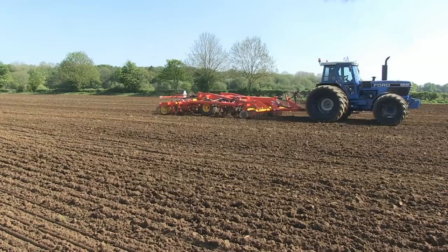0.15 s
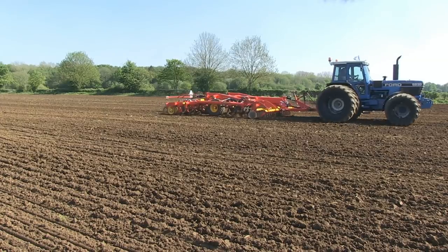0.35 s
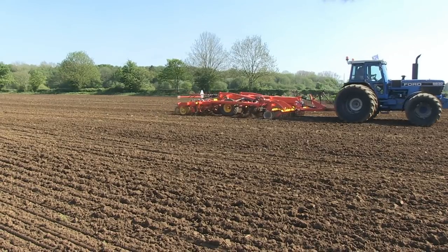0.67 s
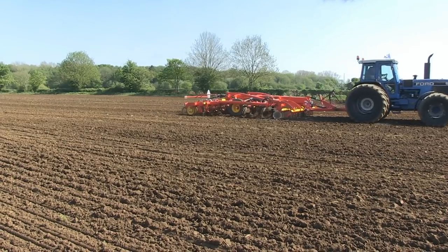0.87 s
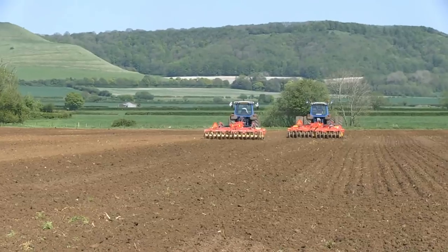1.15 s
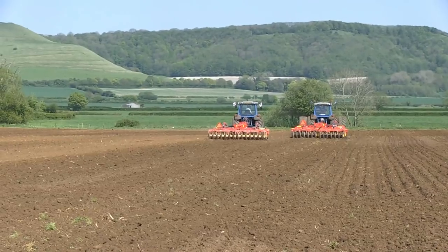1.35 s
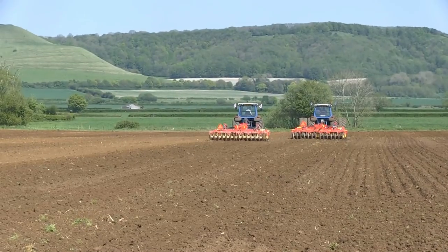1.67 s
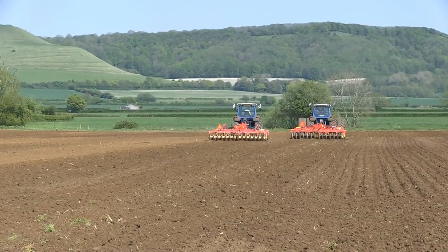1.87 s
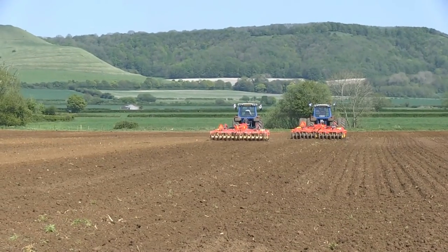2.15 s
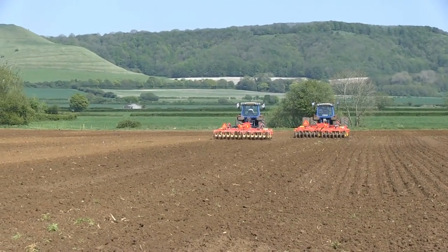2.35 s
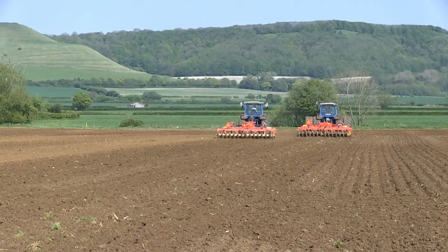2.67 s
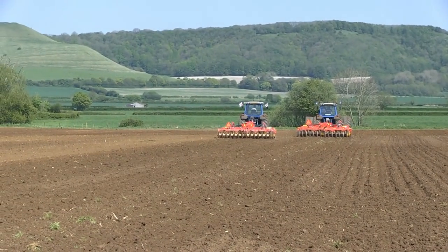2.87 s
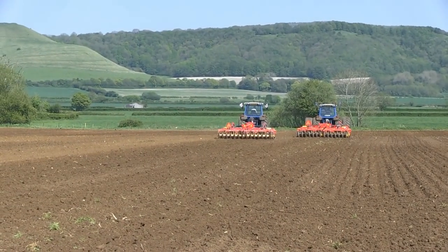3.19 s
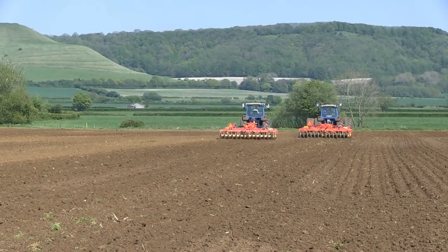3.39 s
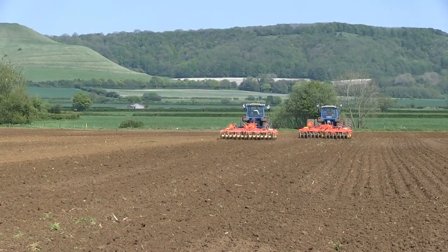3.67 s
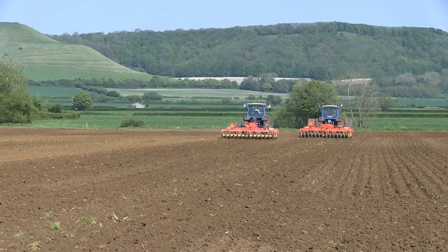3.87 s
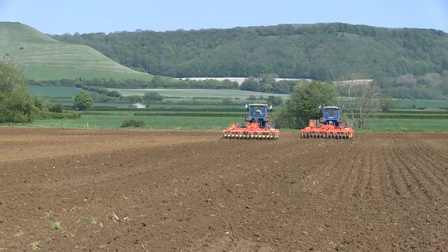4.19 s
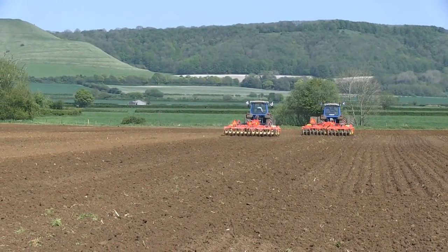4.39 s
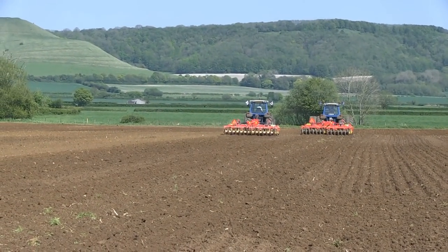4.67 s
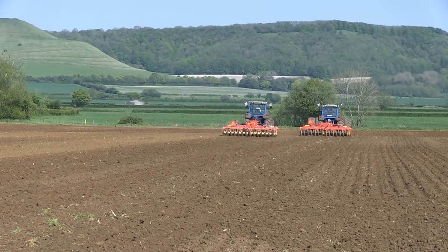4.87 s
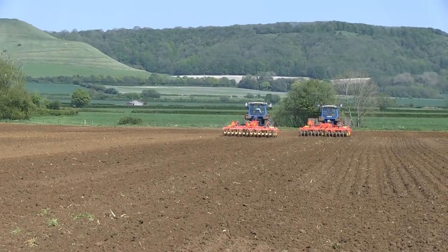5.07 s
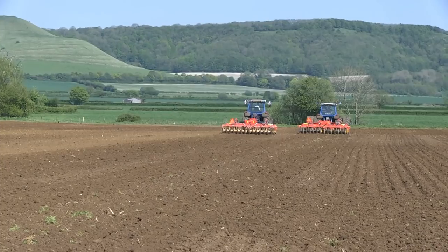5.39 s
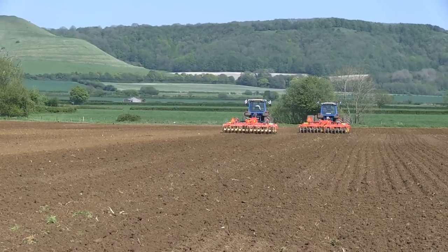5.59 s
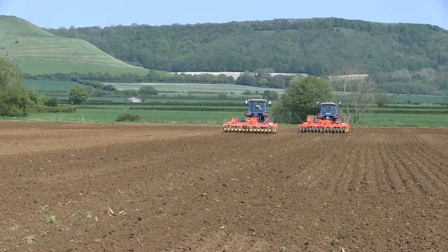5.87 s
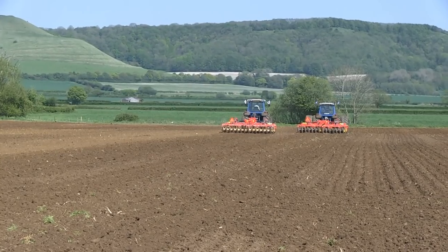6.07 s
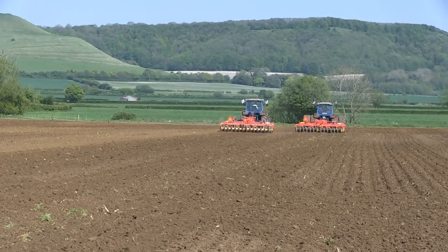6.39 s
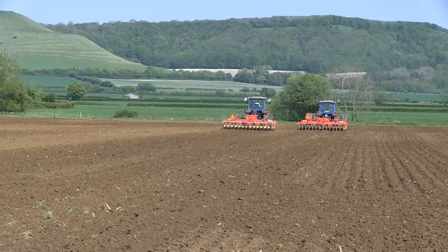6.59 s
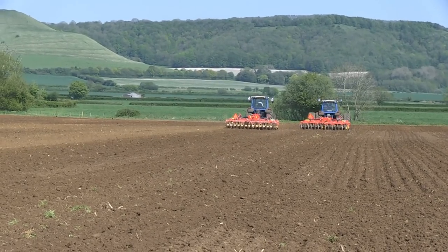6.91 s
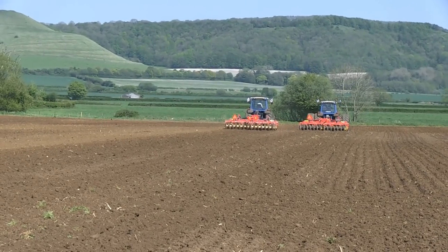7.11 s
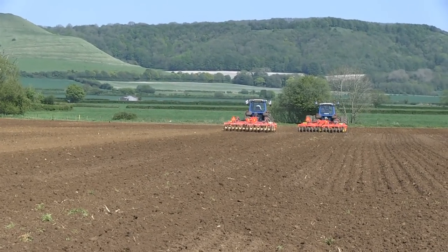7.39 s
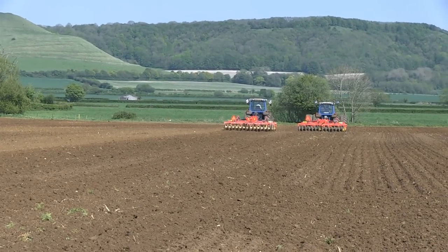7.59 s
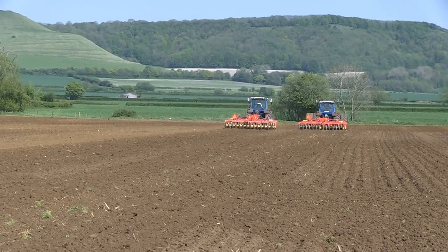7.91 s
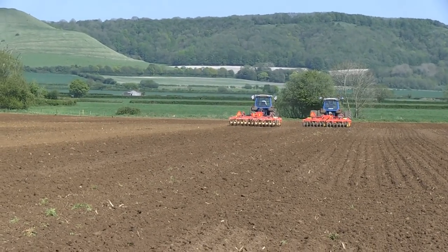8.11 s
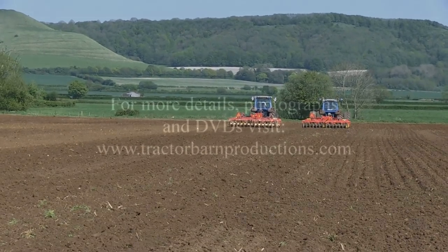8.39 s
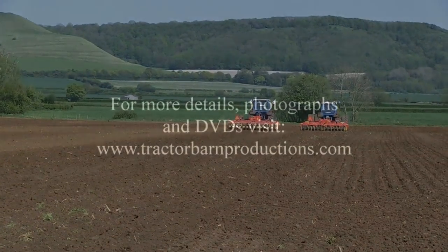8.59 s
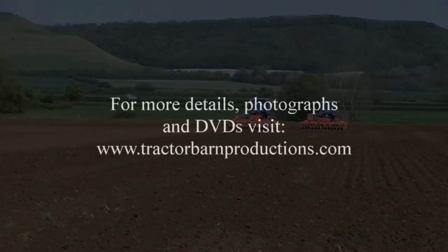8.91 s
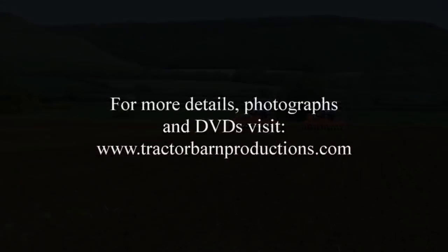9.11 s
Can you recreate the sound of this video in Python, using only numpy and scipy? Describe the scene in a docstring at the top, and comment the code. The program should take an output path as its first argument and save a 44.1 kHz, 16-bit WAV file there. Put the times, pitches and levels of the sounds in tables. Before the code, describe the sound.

For the first second a diesel tractor works close by in an open field: a loud, steady, low drone and pulsing roar, with gear whine and the gritty rush of cultivator tines through soil. At about 1 second it cuts abruptly to two much quieter, distant tractors. Their engine notes beat against each other over diesel clatter, low rumble, faint gear whine and soft soil scraping. A thin, fluttering squeal from a dry roller bearing runs underneath, strongest around 4 seconds. A few very faint dry ticks sound nearby between 2 and 4 seconds. Light wind bumps the microphone just after 1 second and near 7, more softly around 3.3 and 5.5. A faint, bright metallic ring from the machinery swells around 6 and 8 seconds. From about 8 seconds everything fades, reaching silence just after 9.

```python
"""A farm field: a six-cylinder tractor hauls a cultivator close by, and after a second the scene cuts to
two distant tractors. Periodic exhaust pulses give each engine a low drone; the distant firing notes
beat against each other over diesel clatter and gear whine. Tines scrape through soil, the machinery has
a bright metallic ring, and friction makes a dry roller bearing squeal. Light wind buffets the
microphone, a few faint ticks sound nearby, and the sound fades out."""
import sys
import numpy as np
from scipy import signal
from scipy.fft import rfft, irfft, next_fast_len
from scipy.io import wavfile

SR = 44100
rng = np.random.default_rng(int(sys.argv[2]) if len(sys.argv) > 2 else 0)


def int16_out(signal):
    """Quantize to a 16-bit WAV file."""
    q = np.round(np.clip(np.atleast_2d(signal).T, -1, 1) * 32767)
    wavfile.write(sys.argv[1], SR, q.astype(np.int16))


N = 407915
T = np.arange(N) / SR

NEAR_END_S, FAR_START_S = 1.005, 1.025
FADE_FROM_S, FADE_TO_S = 8.12, 9.248

# Engine speeds: time_s, firing_rate_hz
NEAR_FIRING = [(0, 101.9), (1, 101.9)]   # steady
SLOW_FIRING = [(2.9, 82.3), (5.4, 81.93), (7.9, 81.18)]   # the slower distant engine sags under load
FAST_FIRING = [(4.6, 92.95), (6.3, 92.35), (8.6, 94.0)]   # the faster one dips and picks up
# Tones at multiples of the four-stroke cycle rate, order 6 being the firing note: order, level_db
NEAR_TONES = [(4, -55), (5, -36), (6, -19.5), (7, -34), (9, -46.5), (10, -55), (11, -43.5), (12, -45),
              (14, -39), (16, -53.5), (17, -47), (20, -44), (26, -44.5), (27, -40.5), (28, -44),
              (32, -44.5), (47, -41), (54, -41), (57, -38), (75, -61.5), (76, -41)]   # low exhaust drone and faint higher whines
SLOW_TONES = [(3, -59), (4, -61), (6, -31.5), (7, -42), (8, -43), (9, -48), (10, -46.5), (12, -39.5),
              (13, -73), (14, -45.5), (15, -57), (16, -61), (18, -61.5), (20, -68), (22, -62.5),
              (24, -62.5), (30, -61.5), (32, -60), (33, -71), (34, -67.5), (36, -60.5), (38, -59.5),
              (39, -65.5), (40, -61.5), (42, -69.5), (44, -63), (46, -67.5), (50, -62.5), (51, -65.5)]
FAST_TONES = [(6, -37.5), (7, -53), (8, -61), (9, -53.5), (12, -59.5), (16, -81.5)]
# Relative knock of each cylinder, in firing order: strength_db
CYLINDER_KNOCK = [1, -7.5, -2, 2.5, 2, -7]
# Transmission tones: pitch_hz, width_hz, level_db
NEAR_GEAR_TONES = [(677, 1.5, -30), (743, 4, -36), (582, 4, -37), (1017, 5, -40), (1324, 5, -41),
                   (1423, 5, -43), (1743, 5, -44), (2112, 12, -39), (4400, 70, -41)]
FAR_GEAR_TONES = [(628, 6, -58), (1093, 5, -60), (2013, 12, -60), (2497, 18, -58), (2668, 16, -61)]

# Shapes of noise spectra: frequency_hz, relative_density_db
ROAR_SPECTRUM = [(15, -31), (35, -13.5), (130, -3), (215, -3), (270, -12.5), (330, -3), (440, -5.5),
                 (560, 1.5), (690, 0), (850, -7), (1050, -4.5), (1800, -8), (2150, -5.5), (3300, -21)]   # near engine roar and fan rush
NEAR_SOIL_SPECTRUM = [(1200, -16.5), (2300, -6), (2750, 0), (3270, -7), (3560, -2.5), (4000, -5.5),
                      (4400, -3.5), (5100, -4.5), (5500, -10.5), (7800, -13), (10500, -25), (13000, -29.5),
                      (15700, -33)]   # soil rushing over the near tines
CLATTER_SPECTRUM = [(180, -16.5), (250, -10), (370, -5), (480, -6), (640, 0), (860, -1), (1020, -6),
                    (1400, -10.5), (2000, -22.5), (3500, -36)]   # distant combustion noise
INJECTOR_SPECTRUM = [(3000, -14.5), (3450, -1), (4000, -10), (4350, -2), (4780, -2), (5000, -5.5),
                     (5300, -15.5), (6500, -27.5)]
RUMBLE_SPECTRUM = [(10, -34), (22, -9.5), (36, -1), (75, -0.5), (140, 0.5), (160, 0.5), (185, -5.5),
                   (215, -22.5), (300, -47)]
FAR_SOIL_SPECTRUM = [(700, -21), (1200, -3.5), (1650, 0), (2050, 0), (2300, 0), (2600, -4), (2850, -5.5),
                     (3500, -11), (4100, -12.5), (4600, -15.5), (5300, -23), (6500, -36)]
HISS_SPECTRUM = [(4000, -14), (5400, 4.5), (6300, 0.5), (7500, -5.5), (9000, -16.5), (12000, -26)]
RING_SPECTRUM = [(2500, -1), (2700, -3), (2900, -7), (3150, -2), (3450, 2), (3750, -7), (4550, -13),
                 (4770, -1), (4950, -20)]   # bright metallic ring from the distant machinery
TICK_SPECTRUM = [(7000, -5), (12000, -5), (13700, 3), (14800, -12)]
FLOOR_SPECTRUM = [(100, 0), (16000, 0.0015)]

# Course of the distant injector tick: time_s, relative_level_db
INJECTOR_LEVELS = [(1.2, -59), (1.8, -57), (2.4, -65.5), (3.8, -68), (4.9, -63), (6.9, -63.5), (8.0, -57.5),
                   (9.0, -63)]
# Passing changes of level: centre_s, half_length_s, change_db
SOIL_LOADS = [(1.8, .38, -1.5), (8.36, 0.2, 3)]   # the distant tines meet lighter or heavier soil
HISS_RISES = [(1.15, 0.16, 11), (2.95, 0.31, 6), (9.1, .15, 6)]
RING_RISES = [(6.2, .7, 8), (7.8, 0.66, 8.5)]   # the ring swells in the second half
BEARING_BINDS = [(1.15, 0.41, -12), (2.03, .08, 5), (3.35, .12, 4.5), (4.05, 0.42, 10.5), (8.2, .25, 3),
                 (9.1, .08, 6)]   # the bearing binds and squeals louder, or runs free
# Low thuds and rumbles of wind: centre_s, half_length_s, pitch_hz, level_db
WIND_PUFFS = [(1.132, .022, 57, -25.5), (3.3, .12, 32.6, -40), (5.52, .05, 36, -42),
              (6.937, .022, 49.9, -32)]
# Faint dry ticks close by: start_s, relative_level_db, decay_s
DRY_TICKS = [(2.181, -64, .004), (2.376, -64, .004), (3.143, -60, .013), (3.22, -63, .008),
             (3.238, -65, .005), (3.267, -64, .006), (3.415, -60, .003), (4.072, -54, .003),
             (4.088, -64, .006)]


def from_db(db):
    """Amplitude grows tenfold for every 20 dB."""
    return 10 ** (np.asarray(db) / 20)


def unit_rms(x):
    """Dividing a signal by its rms gives it unit power."""
    return x / np.sqrt(np.mean(x ** 2) + 1e-20)


def curve(rows):
    """Linear interpolation turns (time, value) rows into a value for every sample."""
    times, values = np.transpose(rows)
    return np.interp(T, times, values)


def swells(rows):
    """Gaussian rises and dips add up to a change of level in dB."""
    return sum(db * np.exp(-.5 * ((T - centre) / half_length) ** 2) for centre, half_length, db in rows)


def noise(gain_at):
    """Filtered white noise takes the amplitude spectrum gain_at(hz); its rms is 1."""
    size = next_fast_len(N, True)
    hz = np.maximum(np.arange(size // 2 + 1) * SR / size, 1)
    return unit_rms(irfft(rfft(rng.standard_normal(size)) * gain_at(hz), size)[:N])


def coloured(spectrum):
    """Band-limited noise follows a spectrum table and falls 24 dB per octave beyond its ends."""
    points_hz, db = np.transpose(spectrum)
    skirts = lambda hz: np.minimum(1, np.minimum(hz / points_hz[0], points_hz[-1] / hz)) ** 4
    return noise(lambda hz: from_db(np.interp(np.log(hz), np.log(points_hz), db)) * skirts(hz))


def drift(rate_hz):
    """Low-pass noise is a slow random fluctuation of rms 1."""
    return noise(lambda hz: 1 / (1 + (hz / rate_hz) ** 2))


def crank(firing_rates, jitter):
    """Phase is the integral of rate, here counted in four-stroke cycles of six firings."""
    firing_hz = curve(firing_rates) * (1 + jitter * drift(5))
    return np.cumsum(firing_hz) / SR / 6 + rng.random()


def engine_tones(cycles, tones, lag_turns=1 / 16):
    """Sines at multiples of the cycle rate sum to a low exhaust drone and faint higher whines."""
    return np.sqrt(2) * sum(from_db(db) * np.sin(2 * np.pi * (order * cycles - lag_turns * order ** 2))
                            for order, db in tones)   # higher orders are delayed more


def knock(cycles, depth, sharpness=2):
    """Combustion modulates amplitude: the envelope swells at each firing, as strong as its cylinder."""
    firings = cycles * len(CYLINDER_KNOCK)
    strength = from_db(CYLINDER_KNOCK)[firings.astype(int) % len(CYLINDER_KNOCK)]
    return unit_rms(1 + depth * strength * abs(np.sin(np.pi * firings)) ** sharpness)


def whine(pitch_hz, width_hz, waver_db=3.0):
    """Random modulation of pitch and amplitude broadens a tone into a narrow band."""
    turns = np.cumsum(pitch_hz + width_hz / 2 * drift(2 * width_hz)) / SR
    return unit_rms(np.sin(2 * np.pi * turns) * from_db(waver_db * drift(width_hz)))


def gears(tones):
    """Meshing gears radiate narrow tones, which superpose as transmission whine."""
    return sum(from_db(db) * whine(pitch_hz, width_hz) for pitch_hz, width_hz, db in tones)


def near_tines(level_db=-25):
    """Friction of soil on tines gives broadband noise; rapid modulation makes it gritty."""
    grit = unit_rms(from_db(drift(150)))
    return from_db(level_db) * coloured(NEAR_SOIL_SPECTRUM) * grit


def near_tractor(roar_db=-18):
    """One crank times both the firing note and the pulsing roar; soil and gear noise add to them."""
    cycles = crank(NEAR_FIRING, jitter=0.0017)
    roar = from_db(roar_db) * coloured(ROAR_SPECTRUM) * knock(cycles, depth=.25)
    return engine_tones(cycles, NEAR_TONES) + roar + near_tines() + gears(NEAR_GEAR_TONES)


def diesel_clatter(cycles, level_db=-43.5, air_waver_db=0.85):
    """Combustion noise pulses at the firing rate; moving air along its path makes the level waver."""
    gain = from_db(level_db + air_waver_db * drift(5.5))
    return gain * coloured(CLATTER_SPECTRUM) * knock(cycles, depth=0.62)


def injectors(cycles, gain_db=1.5):
    """Fuel injection gives a short pulse of bright noise at every firing."""
    gain = from_db(curve(INJECTOR_LEVELS) + gain_db + drift(6.7))
    return gain * coloured(INJECTOR_SPECTRUM) * knock(cycles, depth=1.0, sharpness=5.5)


def cooling_fan(cycles, level_db=-42, passes_per_cycle=6.965):
    """A belt-driven fan hums at its blade-passing frequency, proportional to engine speed."""
    return from_db(level_db) * unit_rms(np.sin(2 * np.pi * passes_per_cycle * cycles))


def far_tines(cycles, soil_db=-45, clod_db=0.48, hiss_db=-74):
    """Friction noise of tines in clods mixes with the top of the engine's knock and a high hiss."""
    gain = from_db(soil_db + swells(SOIL_LOADS) + clod_db * drift(40))
    scrape = gain * coloured(FAR_SOIL_SPECTRUM) * knock(cycles, depth=0.35)
    hiss = from_db(hiss_db + swells(HISS_RISES)) * coloured(HISS_SPECTRUM)
    return scrape + hiss


def metallic_ring(level_db=-66, flicker_db=3.5):
    """Noise with spectral peaks near 3.4 and 4.8 kHz is heard as a bright ring from the machinery."""
    return from_db(level_db + swells(RING_RISES) + flicker_db * drift(60)) * coloured(RING_SPECTRUM)


def roller_squeal(pitch_hz=2457, level_db=-55.5, flutter_db=1.4, wander_db=1.8):
    """Stick-slip friction in a dry bearing sustains a tone that flutters as it catches and lets go."""
    grip = unit_rms(from_db(flutter_db * drift(35) + wander_db * drift(3.7)))
    return from_db(level_db + swells(BEARING_BINDS)) * grip * whine(pitch_hz, width_hz=16, waver_db=1.0)


def far_tractors(fast_gain_db=2, rumble_db=-41):
    """Two engines at slightly different speeds beat at the difference of their firing rates."""
    slow, fast = crank(SLOW_FIRING, jitter=0.00097), crank(FAST_FIRING, jitter=.003)
    drone = engine_tones(slow, SLOW_TONES) + from_db(fast_gain_db) * engine_tones(fast, FAST_TONES)
    hum = cooling_fan(slow)   # just above the faster engine's firing note, so the two beat slowly
    clatter = diesel_clatter(slow) + injectors(slow)
    rumble = from_db(rumble_db) * coloured(RUMBLE_SPECTRUM)
    machinery = gears(FAR_GEAR_TONES) + far_tines(slow) + metallic_ring() + roller_squeal()
    return drone + hum + clatter + rumble + machinery


def wind(pitch_wander=.12):
    """Each puff of air on the microphone swings the pressure for a few uneven cycles."""
    uneven_time = np.cumsum(1 + pitch_wander * drift(15)) / SR
    pressure = np.zeros(N)
    for centre, half_length, hz, db in WIND_PUFFS:
        envelope = from_db(db) * np.exp(-.5 * ((T - centre) / half_length) ** 2)
        pressure += envelope * np.sqrt(2) * np.sin(2 * np.pi * (hz * uneven_time + rng.random()))
    return pressure


def ticks(gain_db=-3):
    """Bright noise with a sudden onset and fast exponential decay is heard as a tiny snap."""
    envelope = sum(from_db(db + gain_db) * (T >= start) * np.exp(-abs(T - start) / decay)
                   for start, db, decay in DRY_TICKS)
    return envelope * coloured(TICK_SPECTRUM)


def scene(floor_db=-76, ramp_s=0.0027):
    """Sources superpose, alike in both ears: the near tractor, a short gap, then the distant pair."""
    floor = from_db(floor_db) * coloured(FLOOR_SPECTRUM)
    far = far_tractors() + wind() + ticks() + floor
    near_gate = np.clip((NEAR_END_S - T) / ramp_s, 0, 1)
    far_gate = np.clip((T - FAR_START_S) / ramp_s, 0, 1)
    mono = near_tractor() * near_gate + far * far_gate
    return np.array([mono, mono])


def record(dry, low_cut_hz=12, high_cut_hz=15700):
    """The amplitude falls linearly to silence at the end, and two filters limit the bandwidth."""
    fade = np.clip((FADE_TO_S - T) / (FADE_TO_S - FADE_FROM_S), 0, 1)
    high_pass = signal.butter(1, low_cut_hz, "high", fs=SR, output="sos")
    low_pass = signal.ellip(12, .1, 80, high_cut_hz, fs=SR, output="sos")
    return signal.sosfilt(low_pass, signal.sosfilt(high_pass, dry * fade))


dry = scene()
out = record(dry)
int16_out(out)
```